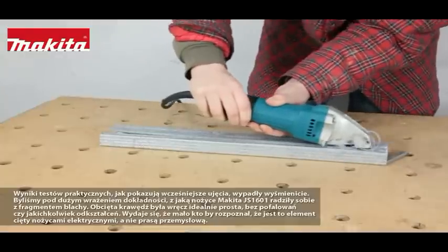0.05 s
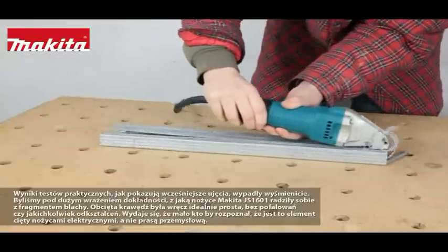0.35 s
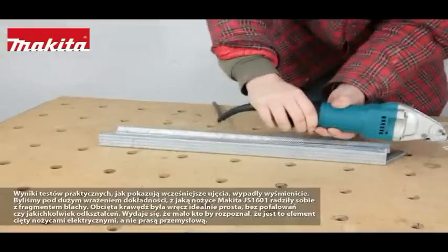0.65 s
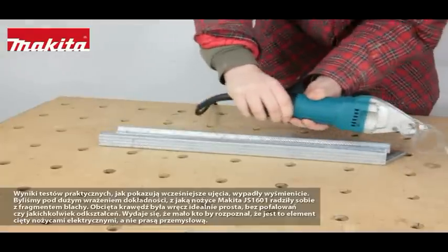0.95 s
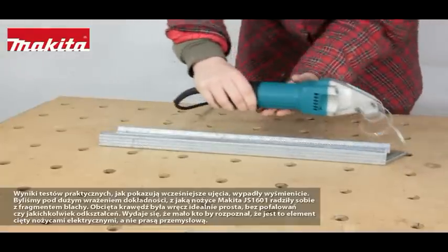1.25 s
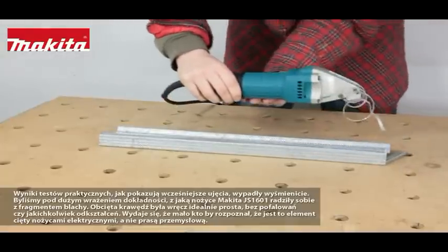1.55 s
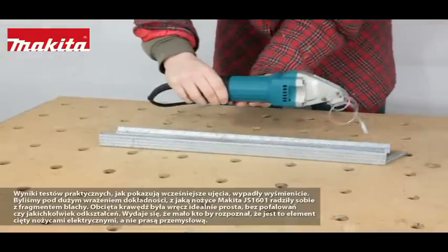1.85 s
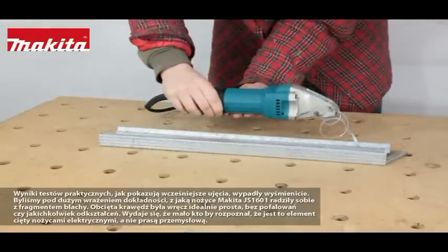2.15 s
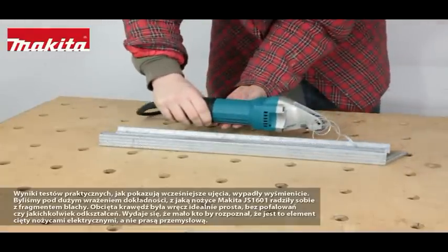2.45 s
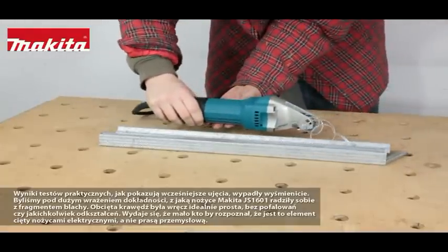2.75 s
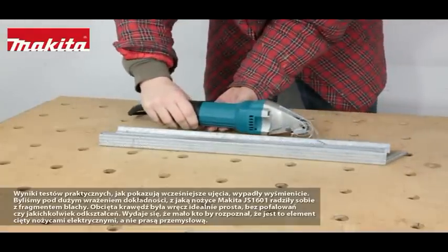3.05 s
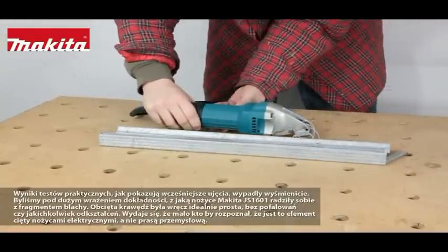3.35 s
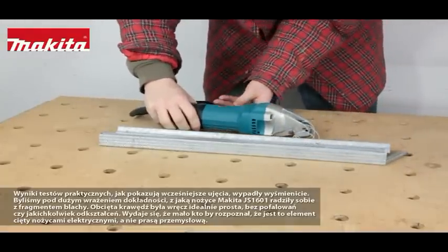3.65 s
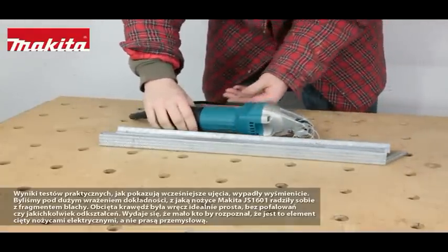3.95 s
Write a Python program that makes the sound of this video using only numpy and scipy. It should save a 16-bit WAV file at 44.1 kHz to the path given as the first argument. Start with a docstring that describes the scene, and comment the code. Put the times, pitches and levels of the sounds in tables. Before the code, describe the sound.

An electric shear cuts sheet metal, clangs through the end, whirs freely and winds down.

```python
"""An electric shear chews through a strip of sheet metal, each blade stroke snapping and tearing it.
The blade breaks out of the end with a ringing clash, and the motor runs free with a rush of air.
Switched off, it slows down with rattling gears and falling whines, and thuds onto a wooden bench.
The sound is nearly mono, with the short echo of a small workshop."""
import sys
import numpy as np
from scipy import signal
from scipy.fft import rfft, irfft
from scipy.io import wavfile

SR = 44100
rng = np.random.default_rng(int(sys.argv[2]) if len(sys.argv) > 2 else 0)


def write(x):
    x = np.atleast_2d(x).T
    wavfile.write(sys.argv[1], SR, np.round(np.clip(x, -1, 1) * 32767).astype(np.int16))


N = 176400

# How hard the blade cuts: time_s, level_db
CUT_LEVEL = [(0, -9.5), (.06, -16.5), (.1, -16.5), (.16, -16.5), (.21, -21), (.28, -16), (.36, -21),
             (.42, -21.5), (.47, -42), (.5, -37)]
# Tone of the cut: pitch_hz, level_db
CUT_TONE = [(29, 0), (50, -24), (96, -19), (129, -29), (158, -21), (317, -16.5), (434, -9), (486, -8.5),
            (954, -3), (2460, -1), (3370, -0.5), (4120, -5.5), (6760, -8.5), (10800, -36), (14100, -73),
            (22000, -120)]
# Resonances of the sheet held in the jaws: pitch_hz, width_hz, level_db
GRIPPED_SHEET = [(319, 21, 10.5), (986, 27, -5.5), (1435, 19, 1), (3370, 31, -6), (3446, 19, 3),
                 (5230, 19, 3), (7270, 120, 2)]
# Single hard bites of the blade: start_s, level_db
BLADE_BITES = [(.03, -28), (.075, -6), (.1, -11), (.308, -29)]
# Hits on the freed end of the sheet: start_s, level_db
CLASH_HITS = [(.429, -9), (.439, -5), (.448, -8.5), (.459, -15.5), (.485, -15.5)]
# Tone of the clash: pitch_hz, level_db
CLASH_TONE = [(47, -64), (80, -40), (358, -11.5), (563, -26), (650, -11), (1040, -27), (1780, -7.5),
              (2230, -10), (2850, 4.5), (3160, -1.5), (5860, -1), (10800, -15.5), (14100, -61),
              (22000, -120)]
# Ringing notes of the sheet: pitch_hz, level_db, fade_s
SHEET_NOTES = [(1487, -13, .4), (2094, -6, .5), (2514, -7, .5), (2785, -9, .4), (2853, -7, .5),
               (3440, 0, .6), (3693, -8, .6), (3849, -5, .5), (4242, -9, .6), (4910, -9, .6),
               (5198, -8, .4), (5609, -2, .45), (5943, -7, .5), (6401, -6, .35), (7106, -8, .38)]
# How fast the motor spins: time_s, turns_per_s
MOTOR_SPEED = [(0, 448), (.3, 452.5), (.7, 454), (.85, 458), (1.2, 465), (1.56, 468.4), (2.04, 469.7),
               (2.12, 442), (2.25, 404), (2.48, 338), (2.7, 291), (2.9, 258), (3.1, 226), (3.3, 192),
               (3.5, 156), (3.7, 120), (3.88, 92), (4, 72)]
# Rush of the fan and brushes: time_s, level_db
WHIRR_LEVEL = [(0, -21), (.72, -24.5), (1.02, -21), (1.35, -20), (1.7, -19), (2.06, -18.5), (2.15, -20.5),
               (2.5, -23), (2.9, -25), (3.3, -28), (4, -31.5)]
# Tone of that rush: pitch_hz, level_db
WHIRR_TONE = [(59, -49), (100, -32), (140, -34.5), (427, -31.5), (462, -14), (509, -23), (670, -16),
              (1030, -8), (1720, -22.5), (1970, -14), (2540, -13.5), (3220, -3.5), (3910, 0), (4400, -2.5),
              (5570, 1), (7050, 0.5), (10800, -18), (14100, -128), (22000, -120)]
# Resonances of the motor housing: pitch_hz, width_hz, level_db
MOTOR_HOUSING = [(954, 23, -24.5), (1940, 46, 0), (3035, 360, -3.5), (3980, 75, -3), (5414, 85, -15.5),
                 (6720, 53, -11.5)]
# Rattle of the loose gears: time_s, level_db
RATTLE_LEVEL = [(0, -33.5), (2.05, -29), (2.25, -26.5), (2.6, -24), (2.88, -23), (2.97, -23), (3.2, -22),
                (3.38, -20.5), (3.55, -21.5), (4, -18)]
# Tone of that rattle: pitch_hz, level_db
RATTLE_TONE = [(59, -89), (100, -52), (157, -37), (215, -26), (683, -7), (831, -12.5), (1090, -4),
               (1380, -7), (1500, -6.5), (4070, -1.5), (6780, -7.5), (10800, -29), (14100, -101),
               (22000, -120)]
# Resonances of the gear casing: pitch_hz, width_hz, level_db
GEAR_CASING = [(684, 45, -8), (1580, 170, 2), (2400, 220, -9), (2920, 160, -9), (4030, 280, -3),
               (6130, 200, -8)]
# Whines of gear teeth and motor contacts: cycles_per_turn, level_db, fade_below_hz, silent_above_hz
WHINE_NOTES = [(24, -35.5, 1900, 14000), (32, -35, 5500, 14000), (48, -34.5, 3800, 14000),
               (72, -37, 4800, 9500), (96, -42, 7500, 10500)]
# Hum of the off-balance rotor: time_s, level_db
HUM_LEVEL = [(0, -50), (.6, -52), (.85, -51.5), (1.17, -43.5), (1.66, -40.5), (2.03, -43), (2.13, -60),
             (2.2, -45.5), (2.47, -43.5), (2.8, -55), (3.2, -66), (4, -61)]
# Resonances of the bench: pitch_hz, width_hz, level_db
BENCH_WOOD = [(132.8, 17, -1), (205, 53, -4), (258.8, 7.8, 9.5), (302, 56, 3.5), (451, 27, -8),
              (580, 44, -28)]
# The tool shaking the bench: time_s, level_db
DRONE_LEVEL = [(0, -49), (.25, -49), (.35, -42), (.46, -41), (.52, -54), (.7, -61.5), (.8, -85)]
# Knocks of the tool on the bench: start_s, level_db
BENCH_KNOCKS = [(3.405, -30), (3.429, -31), (3.455, -35), (3.473, -27), (3.915, -42.5)]
# Hollow boom under the resting tool: time_s, level_db
BOOM_LEVEL = [(0, -94), (3.38, -88), (3.45, -55), (3.65, -54), (3.77, -45), (3.89, -65), (3.93, -43),
              (4, -37)]
# Tone of the echo that spreads left and right: pitch_hz, level_db
SIDE_TONE = [(1500, -33), (2300, 13), (3300, 2), (5000, -31), (6300, -2.5), (8000, 18.5), (10500, -0.5)]

TURNS_PER_STROKE, DULL_BELOW_TURNS_PER_S = 7, 220
WHINE_JITTER_RAD, WHINE_FLUTTER, WHINE_RING = 1.3, .6, .9
SHIMMER_DELAY_S = .016
BOOM_HZ, BOOM_WIDTH_HZ = 107.7, 22
ECHO_FADE_S, ECHO_DB, SIDE_DB = .46, -6.5, -20


def cutting(turns):
    """Every stroke of the blade snaps the sheet and tears it a little further."""
    strokes = pulses(turns / TURNS_PER_STROKE, scatter_db=3)
    snap = unit(steady(strokes, noise() * fade(.1)))
    tear = unit(noise() * steady(strokes, fade(.25)))
    bites = noise() * ring(blows(BLADE_BITES), fade(.08))
    force = unit(snap + tear) * undb(curve(CUT_LEVEL)) + bites
    cut = colour(force + resonate(force, GRIPPED_SHEET), CUT_TONE)
    return undb(-2) * band(cut, 55, "high")


def clash():
    """The blade strikes the freed end of the sheet, which shimmers and rings."""
    hits = blows(CLASH_HITS)
    crash = colour(noise() * die_away(hits, .26), CLASH_TONE)
    late_hits = np.roll(hits, int(SHIMMER_DELAY_S * SR))
    shimmer = band(band(noise(), 1250, "high", order=4), 2960, "low") * die_away(late_hits, .7)
    t = np.arange(N) / SR
    notes = sum(undb(db) * np.sin(2 * np.pi * (hz * t + rng.random())) * die_away(hits, fade_s)
                for hz, db, fade_s in SHEET_NOTES)
    return undb(-1) * crash + undb(-2) * shimmer + undb(-12) * notes


def motor_whirr(turns):
    """Fan and brushes make a gritty rush in the housing, with a faint slap at each blade stroke."""
    strokes = turns / TURNS_PER_STROKE
    grit = undb(2.8 * np.tanh(wander(hz=450)) + 1.02 * wander(hz=40))
    throb = undb(.36 * np.cos(2 * np.pi * strokes))
    slap = unit(steady(pulses(strokes, scatter_db=2), noise() * fade(.033)))
    rush = (noise() * grit + undb(-13) * slap) * throb
    whirr = colour(rush + resonate(rush, MOTOR_HOUSING), WHIRR_TONE)
    return unit(whirr) * undb(curve(WHIRR_LEVEL))


def gear_rattle(turns, speed):
    """Loose teeth clatter in the casing, duller and more hollow as they slow."""
    clatter = steady(pulses(turns, scatter_db=4.5), fade(.054))
    rattle = noise() * (unit(clatter) + .5)
    pace = speed / DULL_BELOW_TURNS_PER_S
    hollow = undb(-1.5 + 13.6 * (1 - pace))
    body = colour(rattle + hollow * resonate(rattle, GEAR_CASING), RATTLE_TONE) / np.hypot(1, .5 * hollow)
    dull = band(body, 3800, "low", order=1)
    treble = (body - dull) * np.minimum(pace, 1) ** 1.1
    return unit(dull + treble) * undb(curve(RATTLE_LEVEL))


def whines(turns, speed):
    """Rough high notes follow the motor speed and swell as they pass the casing's resonances."""
    notes = 0
    for per_turn, db, fade_below_hz, silent_above_hz in WHINE_NOTES:
        phase = 2 * np.pi * per_turn * turns + WHINE_JITTER_RAD * wander(hz=79.5)
        in_range = np.clip((silent_above_hz - per_turn * speed) / 1000, 0, 1)
        note = np.sqrt(2) * np.sin(phase) * (1 + WHINE_FLUTTER * wander(hz=60)) * in_range
        notes += undb(db) * band(note, fade_below_hz, "high", order=3)
    return band(notes + WHINE_RING * resonate(notes, GEAR_CASING), 6200, "low")


def rotor_hum(turns):
    """The off-balance rotor shakes the tool once a turn."""
    return np.sqrt(2) * np.sin(2 * np.pi * turns) * undb(curve(HUM_LEVEL) + .24 * wander(hz=12))


def bench(turns):
    """The wooden top drones under the strokes, thuds as the tool is put down and booms under it."""
    shake = unit(pulses(turns / TURNS_PER_STROKE, scatter_db=-2)) + .22 * noise()
    drone = band(band(resonate(shake, BENCH_WOOD), 255, "low"), 60, "high")
    drone = unit(drone) * undb(curve(DRONE_LEVEL))
    hollow = [(BOOM_HZ, BOOM_WIDTH_HZ, 0)]
    boom = unit(resonate(resonate(noise(), hollow), hollow)) * undb(curve(BOOM_LEVEL))
    knocks = blows(BENCH_KNOCKS)
    tail = noise() * fade(.22)
    thuds = resonate(knocks + undb(-3) * ring(knocks, tail / np.linalg.norm(tail)), BENCH_WOOD)
    return drone + boom + undb(44.5) * band(band(thuds, 120, "high", order=1), 580, "low")


def workshop_echo(sound):
    """The walls add a short echo. Returns the sound with its echo, and a faint part for the sides."""
    tails = [band(noise(), 273, "high") * fade(ECHO_FADE_S) for _ in range(2)]
    echo, wide = (steady(sound, tail / np.linalg.norm(tail)) for tail in tails)
    middle = (sound + undb(ECHO_DB) * echo) / np.hypot(1, undb(ECHO_DB))
    side = undb(SIDE_DB) * band(colour(wide, SIDE_TONE), 1500, "high", order=4)
    return middle, side


def room_rumble():
    """A very quiet, low noise lies under everything."""
    return undb(-64) * unit(band(band(noise(), 98, "high"), 310, "low"))


def undb(db):
    """Turn decibels into a volume factor."""
    return 10 ** (np.asarray(db) / 20)


def unit(x):
    """Scale to an average (rms) level of 1."""
    return x / np.sqrt(np.mean(x ** 2))


def curve(rows):
    """Join (time_s, value) rows by straight lines."""
    return np.interp(np.arange(N) / SR, *np.array(rows, float).T)


def noise():
    """Plain white hiss."""
    return rng.standard_normal(N)


def band(x, hz, kind, order=2):
    """Keep what is below ("low") or above ("high") a pitch."""
    return signal.sosfilt(signal.butter(order, min(hz, .45 * SR), kind, fs=SR, output="sos"), x)


def wander(hz):
    """A random wobble of about 1, mostly slower than hz."""
    return unit(band(noise(), hz, "low"))


def ring(x, response):
    """Let every sample of x set off a copy of the response."""
    return signal.fftconvolve(x, response)[:N]


def steady(x, response):
    """Like ring, for a sound that is already under way."""
    lead = SR // 2
    return signal.fftconvolve(np.pad(x, (lead, 0), mode="reflect"), response)[lead:lead + N]


def colour(x, points, size=4096):
    """Shape the tone along (pitch_hz, level_db) points; white hiss keeps its power."""
    hz, db = np.array(points, float).T
    pitches = np.maximum(np.arange(size // 2 + 1) * SR / size, 1)
    gain = undb(np.interp(np.log(pitches), np.log(hz), db)) * np.minimum(pitches / hz[0], 1)
    # Fold the filter so that it never rings ahead of a hit.
    cepstrum = irfft(np.log(gain))
    cepstrum[1:size // 2] *= 2
    cepstrum[size // 2 + 1:] = 0
    response = irfft(np.exp(rfft(cepstrum)))
    return ring(x, response / np.linalg.norm(response))


def resonate(x, rows):
    """Pick out resonances, the pitches at which an object likes to ring."""
    return sum(undb(db) * signal.lfilter(*signal.iirpeak(hz, hz / width, fs=SR), x)
               for hz, width, db in rows)


def pulses(cycles, scatter_db):
    """One click of random size per cycle, shared between neighbouring samples."""
    at = np.flatnonzero(np.diff(np.floor(cycles)) > 0)
    part = (np.ceil(cycles[at]) - cycles[at]) / (cycles[at + 1] - cycles[at])
    size = undb(scatter_db * noise()[:len(at)])
    out = np.zeros(N)
    out[at], out[at + 1] = size * (1 - part), size * part
    return out


def blows(rows):
    """One click for each (start_s, level_db) row."""
    out = np.zeros(N)
    for start_s, db in rows:
        out[int(start_s * SR)] += undb(db)
    return out


def fade(fade_s):
    """A level that falls by 60 dB in fade_s seconds."""
    return np.exp(-np.log(1000) * np.arange(N) / SR / fade_s)


def die_away(hits, fade_s):
    """A level that jumps at each hit and then fades."""
    return np.sqrt(np.abs(ring(hits ** 2, fade(fade_s) ** 2)))


def scene():
    """Mix the shear, the bench and the room; one motor sets the pace of all moving parts."""
    speed = curve(MOTOR_SPEED)
    turns = np.cumsum(speed * (1 + .000393 * wander(hz=14.4))) / SR
    shear = motor_whirr(turns) + gear_rattle(turns, speed) + cutting(turns) + clash()
    middle, side = workshop_echo(shear)
    middle += room_rumble() + whines(turns, speed) + rotor_hum(turns) + bench(turns)
    return np.array([middle + side, middle - side])


def record(dry):
    """Round off the loudest peaks and cut the treble above 11000 Hz."""
    rounded = dry / (1 + (dry / .95) ** 6) ** (1 / 6)
    return signal.sosfilt(signal.ellip(10, .2, 80, 11000, fs=SR, output="sos"), rounded)


dry = scene()
out = record(dry)
write(out)
```